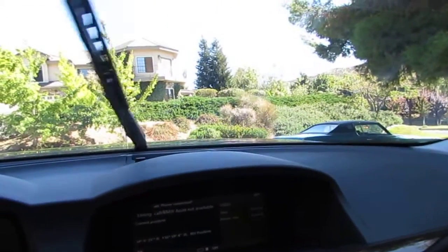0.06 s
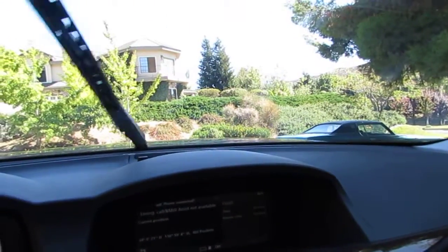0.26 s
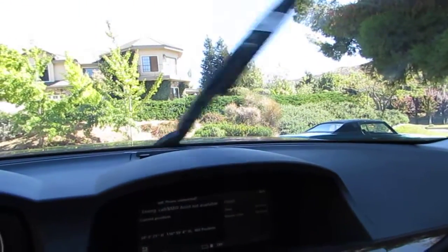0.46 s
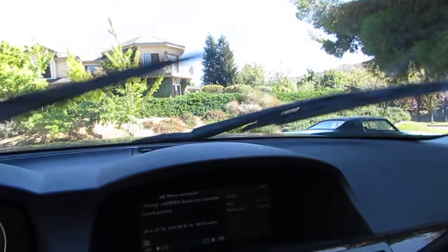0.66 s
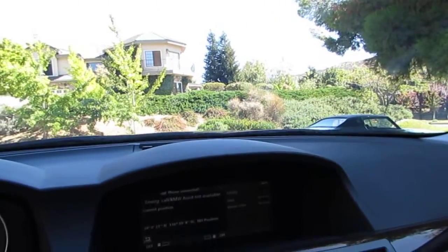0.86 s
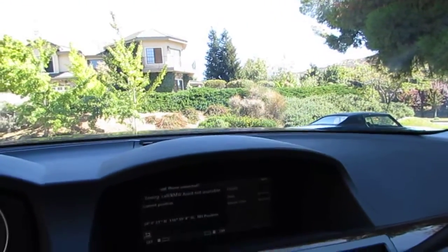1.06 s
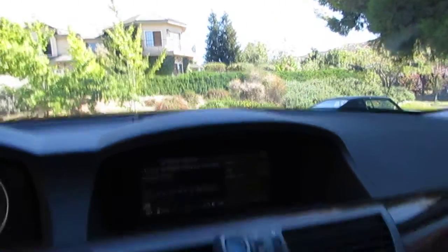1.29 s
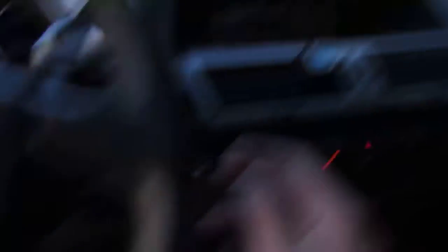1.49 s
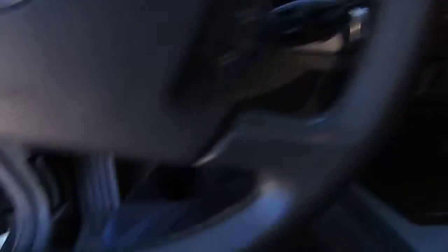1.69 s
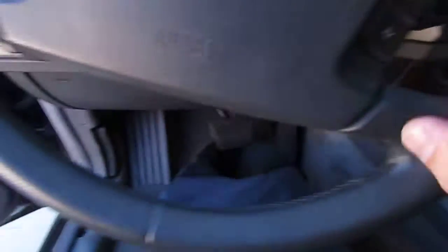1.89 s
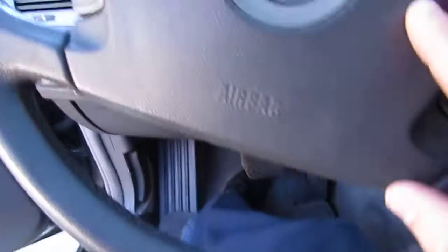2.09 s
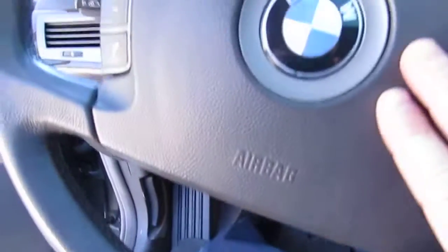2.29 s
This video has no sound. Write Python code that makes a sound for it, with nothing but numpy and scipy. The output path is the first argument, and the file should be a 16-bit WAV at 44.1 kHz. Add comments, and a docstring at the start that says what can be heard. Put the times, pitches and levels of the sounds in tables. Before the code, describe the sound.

Heard from inside a car with a low engine throb, windshield wipers clunk, sweep back and thump to rest. Then come a dull knock on the wiper stalk, a sleeve rustle and a click at the steering wheel.

```python
"""Inside an idling car. The wipers flip over with a clunk that rings arms and windscreen, swish back
down the glass, slow with a groan of the motor and park on the cowl. A faint hum swells.
A sleeve rustles, a hand knocks the wiper stalk and plastic clicks at the steering wheel.
Under it all: the engine's throb and the cabin's soft rush, which later grows fuller in the midrange."""
import sys
import numpy as np
from scipy import signal
from scipy.fft import rfft, irfft
from scipy.io import wavfile
from scipy.ndimage import uniform_filter1d, minimum_filter1d

SR = 44100
rng = np.random.default_rng(int(sys.argv[2]) if len(sys.argv) > 2 else 0)


def digitize_waveform(pressure):
    """Quantize a signal to 16-bit integers and store it at the path in sys.argv[1].

    Rows of a 2-D input are taken as channels; values are limited to [-1, 1].
    """
    field = np.atleast_2d(pressure).T
    bounded = np.clip(field, -1, 1)
    quanta = np.round(bounded * 32767).astype(np.int16)
    wavfile.write(sys.argv[1], SR, quanta)


N = 108045
T = np.arange(N) / SR


def amp(db):
    """Decibels to gain."""
    return 10 ** (np.asarray(db) / 20)


def shape(x, colour):
    """Minimum-phase filter through (freq_hz, gain_db) points."""
    hz, db = np.array(colour, float).T
    size = 2 ** 17
    bins_hz = np.maximum(np.arange(size // 2 + 1) * SR / size, 1)
    gain = amp(np.interp(np.log(bins_hz), np.log(hz), db))
    cepstrum = irfft(np.log(gain))
    cepstrum[1:size // 2] *= 2
    cepstrum[size // 2 + 1:] = 0
    return irfft(rfft(x, size) * np.exp(rfft(cepstrum)))[..., :N]


def lowpass(x, cutoff_hz, order=2):
    """Butterworth low-pass."""
    return signal.sosfilt(signal.butter(order, min(cutoff_hz, SR / 3), fs=SR, output="sos"), x + 1e-18)


def wander(rate_hz):
    """Smooth random motion, unit deviation."""
    hold = max(int(SR / rate_hz), 2)
    steps = np.repeat(rng.standard_normal(400), hold)[:N]
    smooth = uniform_filter1d(uniform_filter1d(steps, hold), hold)
    return smooth / smooth.std()


def stereo(mid, side):
    """Left and right: alike in the bass, apart in the treble."""
    # side response: freq_hz, gain_db
    width = [(40, -32), (80, -71), (170, -30.5), (350, -11), (700, -6.5), (1400, -11), (2800, -19.5),
             (5600, -9.5), (10000, -3), (14000, -2)]
    return mid + shape(side, width) * np.array([[1], [-1]])


def noise(colour):
    """Coloured stereo noise near unit level."""
    mid_side = shape(rng.standard_normal((2, N)), colour)
    return stereo(*(mid_side / mid_side.std()))


def envelope(points):
    """Gain through (time_s, level_db) points, falling 300 dB/s outside them."""
    time_s, level_db = np.array(points).T
    outside_s = np.abs(T - np.clip(T, time_s[0], time_s[-1]))
    return amp(np.interp(T, time_s, level_db) - 300 * outside_s)


def burst(start_s, t60_s, rise_s=0.00017):
    """Two independent decaying noises of unit energy."""
    age_s = np.maximum(T - start_s, 0)
    env = (1 - np.exp(-age_s / rise_s)) * amp(-60 * np.minimum(age_s / t60_s, 10))
    return rng.standard_normal((2, N)) * env / np.sqrt(np.sum(env ** 2))


def ringing(modes, start_s=0):
    """Decaying modes, struck together."""
    age_s = np.maximum(T - start_s, 0)
    return sum(amp(db) * np.sin(2 * np.pi * hz * age_s) * amp(-60 * np.minimum(age_s / t60_s, 10))
               for hz, db, t60_s in modes)


def knocks(blows, modes, thud_db):
    """Each blow thuds, rings the modes, ticks and scatters in the cabin; each contact has its own brightness."""
    # dull thud and its scatter: freq_hz, gain_db
    thud_colour = [(20, -27), (45, -15), (80, 3.5), (300, 6), (550, -2.5), (900, -7.5), (1400, -4),
                   (2100, -21), (4000, -53), (16000, -98)]
    # contact tick: freq_hz, gain_db
    tick_colour = [(500, 22), (2500, -4.5), (4300, 0.5), (7000, -4.5), (10000, -11), (16000, -24)]
    response = ringing(modes)[:SR // 2]
    response = response - lowpass(response, cutoff_hz=42, order=1)
    force, scatter, ticks = 0, 0, 0
    for start_s, level_db, cutoff_hz, tick_db, tick_top_hz in blows:
        force += amp(level_db) * lowpass(signal.unit_impulse(N, int(start_s * SR)), cutoff_hz)
        scatter += amp(level_db) * lowpass(burst(start_s, t60_s=0.072), cutoff_hz)
        tick = burst(start_s, t60_s=0.034, rise_s=0.0014)
        ticks += amp(tick_db - 4.5) * lowpass(tick, tick_top_hz, order=4)
    ring = amp(-3.5) * signal.fftconvolve(force, response)[:N]
    direct = ring + amp(thud_db + 10.5) * shape(force, thud_colour)
    mid, side = amp(thud_db + 19) * shape(scatter, thud_colour) + shape(ticks, tick_colour)
    return stereo(direct + mid, amp(-3) * side - 0.34 * direct)  # direct sound leans right


def engine_idle(firing_hz=38.5):
    """The engine's firing rate booms through the body, slightly uneven."""
    # boom: time_s, level_db
    boom = [(0, -28), (.3, -33.5), (.9, -32.5), (1.55, -30.5), (1.9, -33.5), (2.45, -35.5)]
    # firing harmonics: order, level_db
    harmonics = [(1, -1), (2, -14.5), (3, -20.5)]
    phase = 2 * np.pi * np.cumsum(firing_hz * (1 + 0.045 * wander(22.14))) / SR
    tone = sum(amp(db) * np.sin(order * phase) for order, db in harmonics)
    level_db = np.interp(T, *np.array(boom).T) + 1.6 * wander(24.84)
    return np.sqrt(2) * tone * amp(level_db)


def cabin_rush():
    """Steady soft rush in the cabin."""
    # rush: freq_hz, gain_db
    colour = [(20, -2), (55, -7.5), (95, -0.5), (160, -4), (215, -4.5), (278, -13), (335, -9.5),
              (440, -20.5), (505, -13.5), (570, -21), (850, -24.5), (1400, -25), (2200, -33.5),
              (5000, -44.5), (15500, -58.5)]
    return amp(-34) * noise(colour)


def blade_friction():
    """Rubber hisses over the glass and drags unevenly near the end of the stroke."""
    # hiss, following blade speed: time_s, level_db
    swish_level = [(0, -54), (.08, -60), (.19, -68), (.235, -68), (.25, -54), (.38, -59.5), (.5, -54),
                   (.625, -49.5), (.73, -52.5), (.86, -63.5), (.96, -63.5), (1.1, -72)]
    # hiss: freq_hz, gain_db
    swish_colour = [(300, -5.5), (1200, 1.5), (2500, -6), (4500, -6.5), (7700, -1.5), (10500, -10),
                    (13000, -16), (16000, -24)]
    # drag of the slowing blades: time_s, level_db
    drag_level = [(.35, -80), (.7, -42.5), (.82, -45.5), (.872, -31), (.93, -37.5), (1.04, -37),
                  (1.14, -51)]
    # drag: freq_hz, gain_db
    drag_colour = [(40, -49), (80, 3), (130, 5), (210, 1), (320, -11), (500, -7.5), (720, -7.5),
                   (1100, -28), (1700, -27), (3000, -39), (16000, -57)]
    swish = noise(swish_colour) * envelope(swish_level) * amp(0.41 * wander(50.4))
    drag = noise(drag_colour) * envelope(drag_level) * amp(2 * wander(71.2))
    return swish + drag


def wiper_flip():
    """The blades turn over and strike the glass, ringing arms and windscreen."""
    # blade blows: start_s, level_db, cutoff_hz, tick_db, tick_top_hz
    blows = [(.1943, -9.5, 157, -36, 3000), (.244, -10, 191, -21, 8000), (.2556, -15.5, 900, -26, 8000),
             (.2716, -6.5, 500, -35, 5000), (.277, -10.5, 2340, -6.5, 5600), (.2807, -11, 2200, -4.5, 7000),
             (.2859, -7.5, 945, -7, 6000), (.3026, -2, 1296, -3.5, 12000), (.3076, 4, 686, -5, 10000),
             (.3181, -3.5, 840, -18, 9000), (.3236, -12.5, 1249, -11.5, 11000)]
    # arm and windscreen modes: freq_hz, level_db, t60_s
    screen_modes = [(89, -16.5, 0.28), (192, -25.5, 0.16), (277, -6.5, 0.11), (312, -27, 0.19),
                    (418, -11.5, 0.1), (472, -7, 0.075), (530, -16, 0.098), (703, -11.5, 0.051),
                    (720, -23, 0.079), (816, -7.5, 0.037), (1160, -14.5, 0.059), (1330, -25, 0.018),
                    (1700, -30.5, 0.052)]
    return knocks(blows, screen_modes, thud_db=0)


def wiper_motor():
    """The motor groans under load and sags in pitch as the arms come to rest."""
    # motor run: time_s, pitch_hz, level_db
    run = [(0.4, 135, -72), (0.519, 144.5, -35), (0.68, 147, -43.5), (0.818, 164.2, -48.5),
           (0.893, 164.4, -25), (0.974, 136.8, -36), (1.026, 118.5, -26), (1.065, 104.2, -27),
           (1.14, 99.3, -43)]
    # harmonics 1 and 2: level_db
    harmonics_db = [-1, -28]
    time_s, pitch_hz, level_db = np.array(run).T
    jittered_hz = np.interp(T, time_s, pitch_hz) * (1 + 0.035 * wander(100))
    phase = 2 * np.pi * np.cumsum(jittered_hz) / SR
    tone = sum(amp(db) * np.sin(order * phase) for order, db in enumerate(harmonics_db, 1))
    roughness_db = 2.5 * wander(70.7)
    return np.sqrt(2) * tone * envelope(list(zip(time_s, level_db))) * amp(roughness_db)


def wiper_park():
    """The arms settle on their rests and ring the cowl beneath."""
    # arm contacts: start_s, level_db, cutoff_hz, tick_db, tick_top_hz
    blows = [(.917, -20.5, 346.4, -38, 2980), (.979, 0, 108.5, -40, 2970), (1.0211, -5.5, 167, -25, 3500),
             (1.0533, -13, 710, -33, 4000), (1.0678, -14, 1480, -5, 4100), (1.0776, -9, 1090, -4.5, 3800)]
    # cowl modes: freq_hz, level_db, t60_s
    cowl_modes = [(215.6, -11.5, 0.21), (308, -9.5, 0.081), (515, -29.5, 0.2), (645, -14, 0.092),
                  (737, -32, .044), (1320, -28, 0.038)]
    return knocks(blows, cowl_modes, thud_db=0.5)


def hum(pitch_hz=505):
    """A faint wavering tone swells once the wipers rest."""
    # swell: time_s, level_db
    swell = [(1.13, -64), (1.23, -43.5), (1.33, -55), (1.4, -49), (1.55, -54)]
    phase = 2 * np.pi * np.cumsum(pitch_hz * (1 + 0.0086 * wander(30))) / SR
    return np.sqrt(2) * np.sin(phase) * envelope(swell)


def sleeve_rustle():
    """A sleeve slides with a scratchy flutter."""
    # slide: time_s, level_db
    slide = [(1.3, -61), (1.33, -58.5), (1.42, -49.5), (1.46, -46), (1.528, -42.5), (1.6, -47), (1.72, -50),
             (1.77, -48), (1.8, -57), (1.88, -55), (1.95, -59.5), (2.06, -53.5), (2.2, -62.5),
             (2.26, -57.5), (2.42, -71)]
    # cloth friction: freq_hz, gain_db
    colour = [(300, -1), (1200, 12), (2500, 1.5), (4000, 1.5), (6500, -0.5), (9000, -3), (12500, -8),
              (16000, -15)]
    return noise(colour) * envelope(slide) * amp(2.4 * wander(150))


def stalk_knock():
    """A hand knocks the wiper stalk and rings the steering column."""
    # stalk knocks: start_s, level_db, cutoff_hz, tick_db, tick_top_hz
    blows = [(1.4257, -12, 416, -22, 5000), (1.4298, 0, 163, -18, 4960), (1.4356, -5, 1170, -3, 3950),
             (1.453, -0.5, 243, -28, 3000), (1.4749, -5.5, 231, -40, 3000)]
    # column modes: freq_hz, level_db, t60_s
    column_modes = [(101, -18, 0.24), (156.2, -16, 0.49), (204.5, -9, 0.099), (293, -10, 0.064),
                    (464, -14.5, 0.13), (767, -8.5, 0.037), (848, -22, .045), (1350, -18, 0.023)]
    return knocks(blows, column_modes, thud_db=-5.5)


def turned_rush(midpoint_s=1.53, fade_s=0.1):
    """A fuller midrange rush fades in and stays as the microphone turns."""
    # midrange rush: freq_hz, gain_db
    colour = [(60, -22), (110, 2.5), (210, 1), (300, 0), (360, -2.5), (430, -12.5), (670, -10.5),
              (740, -18), (880, -0.5), (1150, -16), (1400, -10), (2500, -28.5), (6000, -42), (16000, -52.5)]
    fade_in = np.clip((T - midpoint_s) / fade_s + 0.5, 0, 1)
    return amp(-43.5) * noise(colour) * fade_in


def wheel_clicks():
    """Plastic at the wheel clicks and rings under the fingers."""
    # clicks: start_s, level_db, t60_s
    clicks = [(1.979, -19, 0.028), (2.002, -19, 0.1), (2.0129, -2, 0.086), (2.022, -13, 0.11),
              (2.128, -15, 0.1)]
    # click noise: freq_hz, gain_db
    colour = [(150, -27), (600, 12), (1200, 14), (2400, 4.5), (3200, 5), (4600, -3.5), (6600, -1.5),
              (8500, -10), (12000, -9), (16000, -17)]
    # plastic modes: freq_hz, level_db, t60_s
    plastic_modes = [(185, -36, 0.043), (576, -46, .06), (1095, -38, 0.05), (2194, -41, 0.047),
                     (4550, -43.5, 0.042), (6500, -51, 0.035)]
    snaps = sum(amp(db) * burst(start_s, t60_s) for start_s, db, t60_s in clicks)
    ring = sum(amp(db) * ringing(plastic_modes, start_s) for start_s, db, _ in clicks)
    return amp(-8.5) * stereo(*shape(snaps, colour)) + amp(6.5) * ring


def scene():
    """Wipers, hand and idling car together."""
    wipers = wiper_flip() + wiper_park() + wiper_motor() + blade_friction()
    hand = stalk_knock() + wheel_clicks() + sleeve_rustle()
    return wipers + hand + engine_idle() + hum() + cabin_rush() + turned_rush()


def record(dry):
    """Adds a faint electronic whine, limits peaks to full scale and cuts the top."""
    whine_hz, limiter_s, top_hz = 15734, 0.003, 15900
    mix = dry + np.sqrt(2) * amp(-79) * np.sin(2 * np.pi * whine_hz * T)
    window = int(limiter_s * SR)
    overload = np.maximum(np.abs(mix).max(axis=0), 1)
    gain = uniform_filter1d(minimum_filter1d(1 / overload, window), window)
    return signal.sosfilt(signal.ellip(10, 0.2, 80, top_hz, fs=SR, output="sos"), mix * gain)


dry = scene()
out = record(dry)
digitize_waveform(out)
```